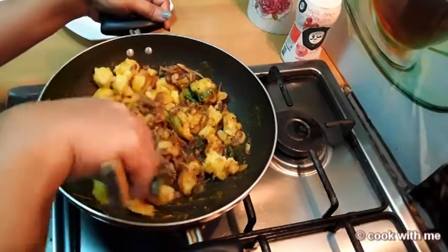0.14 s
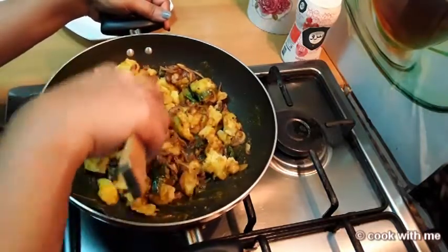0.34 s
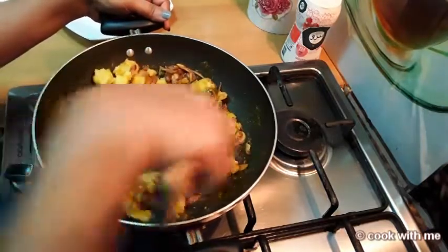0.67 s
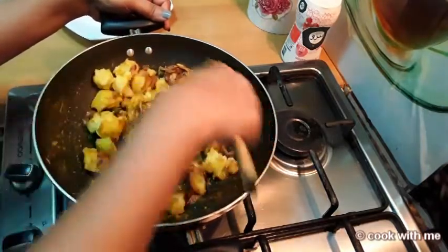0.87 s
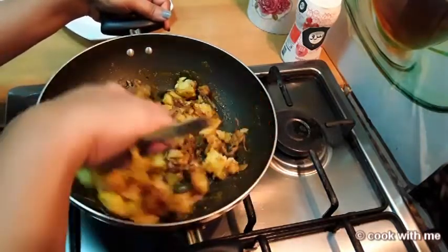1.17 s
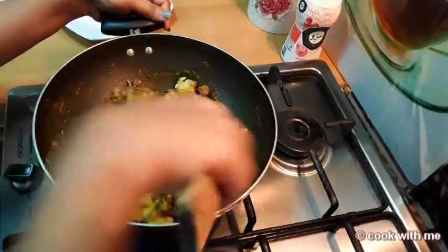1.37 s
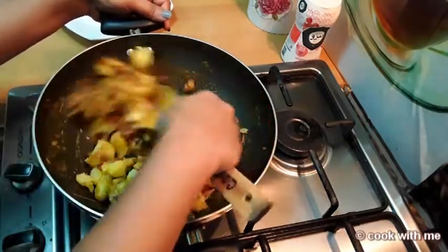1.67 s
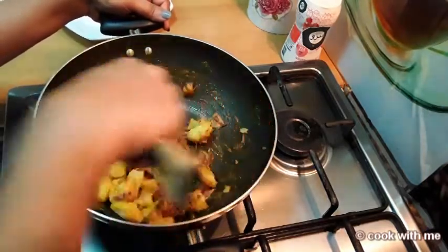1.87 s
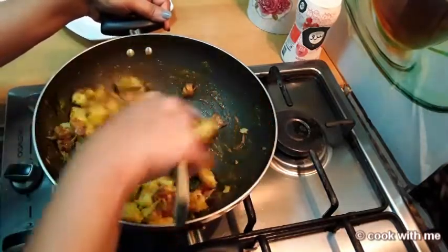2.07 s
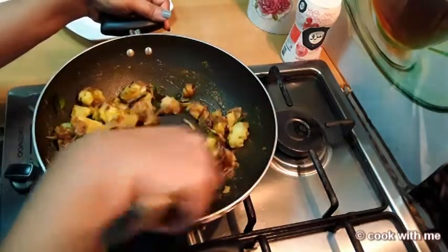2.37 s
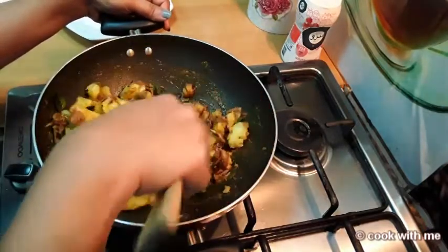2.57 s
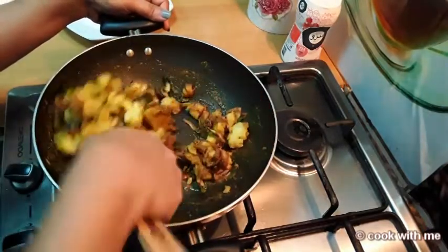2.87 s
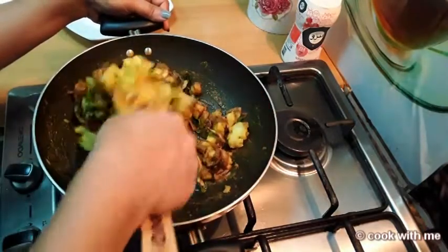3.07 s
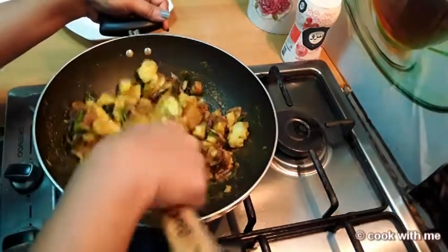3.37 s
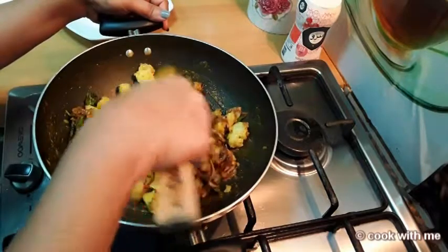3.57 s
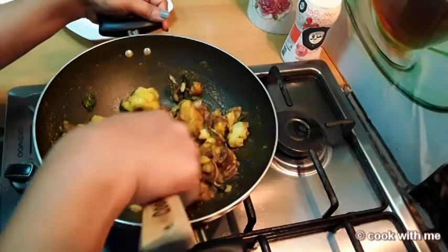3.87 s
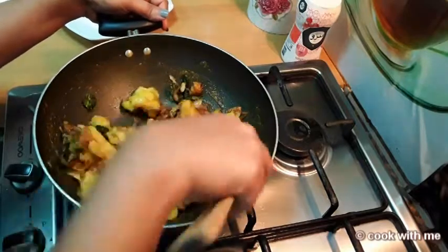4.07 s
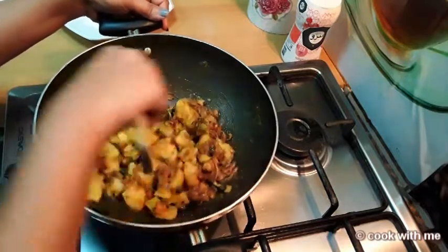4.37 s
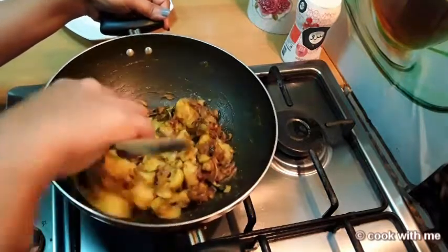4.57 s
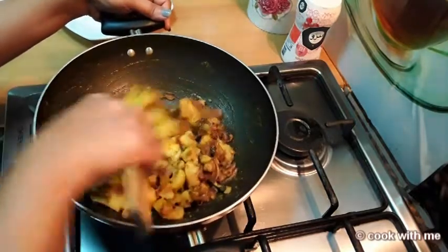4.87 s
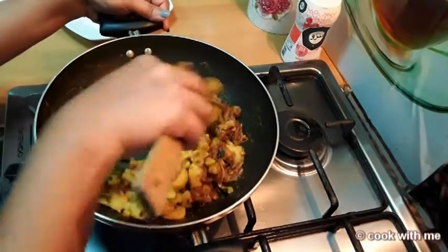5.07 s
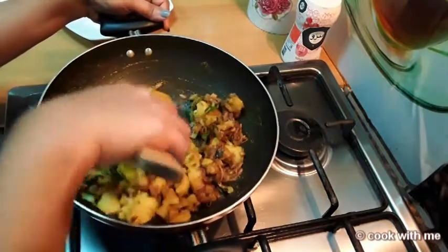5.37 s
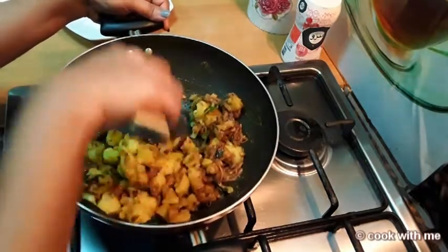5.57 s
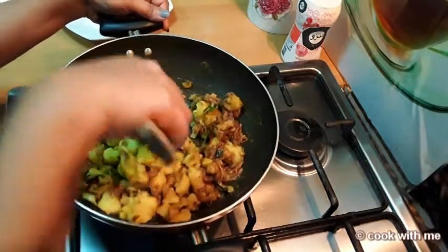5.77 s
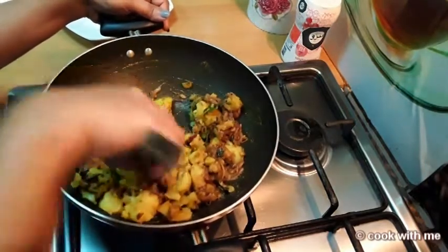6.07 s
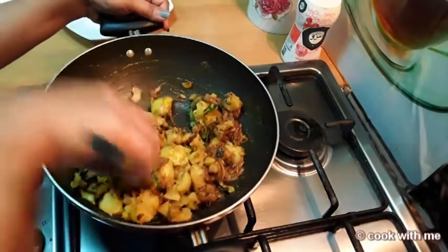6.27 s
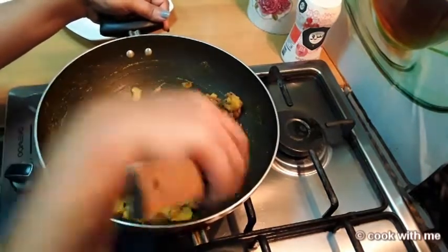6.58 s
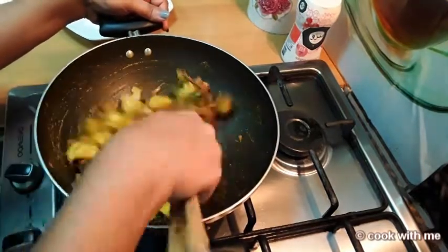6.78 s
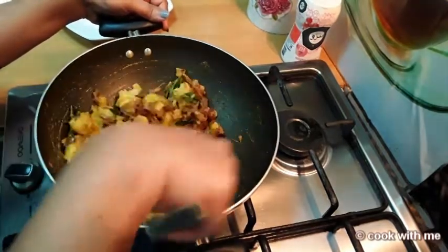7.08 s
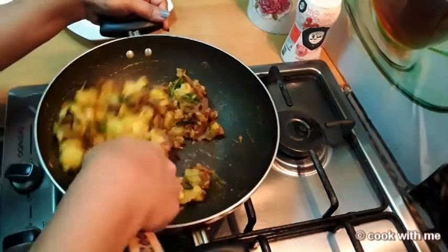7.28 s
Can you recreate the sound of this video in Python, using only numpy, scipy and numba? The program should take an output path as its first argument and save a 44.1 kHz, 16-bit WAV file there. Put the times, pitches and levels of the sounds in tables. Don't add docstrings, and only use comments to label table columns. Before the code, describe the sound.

Close, treble-sharp frying sizzle with crackling spits, short stuttering spatula scrapes and woody pan knocks, building to two loud blows in a small kitchen.

```python
import sys
import numpy as np
from scipy import signal
from scipy.fft import rfft, irfft, next_fast_len
from scipy.io import wavfile
from numba import njit

SR = 44100
rng = np.random.default_rng(int(sys.argv[2]) if len(sys.argv) > 2 else 0)


def attenuation_scalar(level_db):
    decades = np.asarray(level_db, float) / 20
    return 10 ** decades


def unload_audio(sound):
    columns = np.transpose(np.atleast_2d(sound))
    steps = np.round(np.clip(columns, -1, 1) * 32767)
    wavfile.write(sys.argv[1], SR, steps.astype(np.int16))


N = 328104


def rms_one(x):
    return x / np.sqrt(np.mean(x ** 2) + 1e-20)


def in_time(rows):
    s, *columns = np.transpose(rows)
    return [np.interp(np.arange(N) / SR, s, column) for column in columns]


def colour(x, points):
    size = next_fast_len(N)
    hz = np.maximum(np.arange(size // 2 + 1) * SR / size, 1)
    at_hz, level_db = np.transpose(points)
    gain = attenuation_scalar(np.interp(np.log(hz), np.log(at_hz), level_db, left=-80, right=-80))
    return rms_one(irfft(rfft(x, size) * gain, size)[:N])


def drift(rate_hz):
    r = np.exp(-2 * np.pi * rate_hz / SR)
    wander = signal.lfilter([1], [1, -2 * r, r * r], rng.standard_normal(N + SR))
    return rms_one(wander[SR:])


def grains(per_s, spread_db):
    sizes = attenuation_scalar(spread_db * np.minimum(rng.exponential(1, N), 5))
    signs = rng.choice([-1, 1], N)
    return sizes * signs * (rng.random(N) < per_s / SR)


def clicks_at(seconds, sizes):
    out = np.zeros(N)
    out[(np.asarray(seconds) * SR).astype(int)] = sizes
    return out


def burst(seconds, sizes, t60):
    fall = signal.lfilter([1], [1, -attenuation_scalar(-60 / (t60 * SR))], clicks_at(seconds, sizes))
    return fall * rng.standard_normal(N)


def high_pass(x, hz):
    return signal.sosfilt(signal.butter(2, hz, "high", fs=SR, output="sos"), x)


def ring(clicks, hz, t60):
    r, w = attenuation_scalar(-60 / (t60 * SR)), 2 * np.pi * hz / SR
    return signal.lfilter([0, np.sin(w)], [1, -2 * r * np.cos(w), r * r], clicks + 1e-18)


@njit
def glide(x, w, r):
    y = np.zeros(len(x))
    for i in range(2, len(x)):
        y[i] = np.sqrt(1 - r * r) * (x[i] - x[i - 2]) + 2 * r * np.cos(w[i]) * y[i - 1] - r * r * y[i - 2]
    return y


def resonate(x, w, width_hz):
    return glide(x, w, np.exp(-np.pi * width_hz / SR))


# hz, density_db
HUM = [(35, -20), (48, -6.5), (58, 6), (72, -16.5), (98, -0.5), (125, -1.5), (165, -9), (250, -13),
       (325, -5), (400, -13), (480, -15.5), (560, -15.5), (700, -56)]
HUM_DB = -55.5


def room_hum():
    return colour(rng.standard_normal(N), HUM) * attenuation_scalar(HUM_DB + 1.2 * drift(4))


# hz, density_db
FLAME = [(6000, -36), (9500, -13), (12000, -6), (14000, 1.5), (16500, 8.5)]
FLAME_DB, FLAME_FOLLOWS = -38.5, 0.25


def gas_flame(vigour_db):
    return colour(grains(12000, spread_db=1.0), FLAME) * attenuation_scalar(FLAME_DB + FLAME_FOLLOWS * vigour_db)


# at_s, sizzle_db
FRYING = [(0.35, -36.5), (0.79, -39), (1.08, -31.5), (1.22, -36.5), (1.41, -40.5), (1.6, -34), (1.76, -39),
          (2.51, -38.5), (2.82, -34.5), (3.22, -43), (3.38, -39), (4.3, -35), (5.25, -39.5), (5.51, -39.5),
          (6.1, -42.5), (7.0, -37.5), (7.2, -37), (7.44, -40)]
# hz, density_db
SIZZLE = [(2500, -21), (4500, -12), (6000, -15), (8000, -1), (10000, 0), (12000, -1), (14000, -1),
          (16500, -5)]
# hz, density_db
FIZZ = [(350, -38), (700, -2), (1200, -4), (2000, 0), (3000, 1.5), (4500, -0.5), (6000, 1.5), (8000, 2)]
FIZZ_DB, FIZZ_FOLLOWS = -51.5, 0.42


def frying():
    sizzle_db, = in_time(FRYING)
    vigour_db = sizzle_db + 40
    gust = drift(12.0)
    sizzle_level = attenuation_scalar(sizzle_db - 7.5 + 1.4 * gust + 0.45 * drift(130))
    sizzle = colour(grains(7000, spread_db=2.0), SIZZLE) * sizzle_level
    fizz_level = attenuation_scalar(FIZZ_DB + FIZZ_FOLLOWS * vigour_db + 1.1 * gust + 0.2 * drift(9.3))
    fizz = colour(grains(5000, spread_db=-0.5), FIZZ) * fizz_level
    return sizzle + fizz + room_hum() + gas_flame(vigour_db)


# start_s, peak_db
SPITS = [(0.0465, -7), (0.1204, -21.5), (0.1979, -17), (0.294, -42), (0.5484, -14.5), (0.7692, -12),
         (0.826, -12), (1.0176, -10), (1.052, -26), (1.3798, -17), (1.6472, -15), (2.2288, -18),
         (2.594, -17), (3.2544, -21), (3.3737, -22), (3.6287, -31), (3.7824, -18), (3.8681, -12),
         (3.914, -17), (4.905, -7), (4.9566, -15), (5.003, -19), (5.571, -13), (5.9319, -18), (6.562, -27),
         (7.215, -9), (7.2705, -13)]
CRACKLES_PER_S, CRACKLE_DB, CRACKLE_LOW_HZ = 45, -33.5, 7000


def spits():
    s, peak_db = np.transpose(SPITS)
    needle = clicks_at(s, attenuation_scalar(peak_db - 2))
    hiss = burst(s, attenuation_scalar(peak_db - 13), t60=0.0085)
    crackle = high_pass(grains(CRACKLES_PER_S, spread_db=3.5), CRACKLE_LOW_HZ)
    return high_pass(needle + hiss, 6800) + attenuation_scalar(CRACKLE_DB) * crackle


def stand(s, shove_db):
    push = signal.lfilter([.02], [1, -.98], clicks_at(s, attenuation_scalar(shove_db)))
    upper = ring(push, 205.0, 0.2) + 1.55 * ring(push, 274, 0.11)
    return upper + 0.45 * ring(push, 176, 0.43) + 0.22 * ring(push, 99.4, 0.39)


# start_s, shove_db
THUDS = [
    (.75, -37.5),
    (1.43, -40),
    (3.681, -59),
    (5.97, -40),
]


def food_thuds():
    return stand(*np.transpose(THUDS))


def pressure_db(start, hold, db, in_db_per_s, out_db_per_s):
    t = np.arange(N) / SR
    early, late = np.maximum(start - t, 0), np.maximum(t - start - hold, 0)
    return db - in_db_per_s * early - out_db_per_s * late


# full_pressure_s, hold_s, scrape_db, contact_hz, rasp_db
STROKES = [
    (0.06, 0.0083, -22, 1120, -43),
    (0.433, 0.045, -19, 1150, -35.5),
    (0.962, 0.0045, -26, 1120, -31),
    (1.492, 0.022, -24, 1660, -39),
    (1.53, .035, -29.5, 1650, -44),
    (2.711, 0.011, -44, 2200, -31),
]
# full_pressure_s, hold_s, scrape_db, contact_hz, rasp_db
SKIDS = [(0.766, 0.076, -42.5, 1930, -37), (1.017, 0.049, -43.5, 860, -39.5),
         (1.09, 0.022, -39.5, 870, -37), (1.46, 0.04, -45, 1690, -35), (2.045, 0.01, -30, 1590, -29.5),
         (2.813, .02, -48.5, 1220, -40.5), (3.224, 0.17, -52.5, 2100, -42), (3.717, 0.11, -64, 2160, -45),
         (4.825, 0.015, -37, 1200, -36), (4.884, 0.034, -55, 1940, -43), (5.175, 0.081, -53, 2080, -45.5),
         (5.255, 0.017, -46.5, 910, -40.5), (5.673, 0.007, -43.5, 1080, -46),
         (7.126, 0.068, -42.5, 1790, -41)]
# start_s, scrape_db, contact_hz, rasp_db
SLIDES = [
    (1.999, -33, 1350, -52),
    (2.33, -38.5, 1680, -32.5),
    (2.67, -62, 1500, -41),
    (4.04, -52, 2400, -34.5),
    (5.6, -60, 760, -62),
    (6.591, -35.5, 1050, -30.5),
    (7.02, -33.5, 1600, -33.5),
]
# at_s, scrape_db, contact_hz
SWEEP = [
    (4.06, -62, 1800),
    (4.12, -44.5, 1590),
    (4.17, -50, 1600),
    (4.24, -45, 2020),
    (4.279, -38.5, 1130),
    (4.36, -48, 780),
    (4.41, -45.5, 657),
    (4.459, -42.5, 1720),
    (4.51, -64, 1900),
]
PRESS_DB_PER_S, LIFT_DB_PER_S, RASP_IN_DB_PER_S, RASP_OUT_DB_PER_S = 603, 402, 322, 219
SLIDE_IN_DB_PER_S, SLIDE_OUT_DB_PER_S, SLIDE_RASP_OUT_DB_PER_S = 1500, 151, 93
FIRM_CHATTER_DB, SKID_CHATTER_DB, SLIDE_CHATTER_DB, SWEEP_CHATTER_DB = -22, 0, -5.5, -0.5
SWEEP_RASP_DB = 3


def blade():
    before, after = (SWEEP[0][0] - .03, -99, 1800), (SWEEP[-1][0] + .05, -99, 1900)
    sweep_db, sweep_hz = in_time([before, *SWEEP, after])
    power = attenuation_scalar(2 * sweep_db)
    pitch = power * np.log(sweep_hz)
    chatter = power * attenuation_scalar(2 * SWEEP_CHATTER_DB)
    rasp = power * attenuation_scalar(2 * SWEEP_RASP_DB)
    push = (PRESS_DB_PER_S, LIFT_DB_PER_S, RASP_IN_DB_PER_S, RASP_OUT_DB_PER_S)
    slide = (SLIDE_IN_DB_PER_S, SLIDE_OUT_DB_PER_S, SLIDE_IN_DB_PER_S, SLIDE_RASP_OUT_DB_PER_S)
    rows = [(*row, FIRM_CHATTER_DB, *push) for row in STROKES]
    rows += [(*row, SKID_CHATTER_DB, *push) for row in SKIDS]
    rows += [(s, 0, *rest, SLIDE_CHATTER_DB, *slide) for s, *rest in SLIDES]
    for s, hold, db, hz, rasp_db, chatter_db, rise, fall, rasp_rise, rasp_fall in rows:
        own = attenuation_scalar(2 * pressure_db(s, hold, db, rise, fall))
        power = power + own
        pitch = pitch + own * np.log(hz)
        chatter = chatter + own * attenuation_scalar(2 * chatter_db)
        rasp = rasp + attenuation_scalar(2 * pressure_db(s, hold, rasp_db, rasp_rise, rasp_fall))
    return np.sqrt(power), np.exp(pitch / power), np.sqrt(chatter / power), np.sqrt(rasp)


# hz, level_db, t60_s
BOWL = [(390, 0.5, 0.06), (584, 2.5, 0.045), (620, -8, 0.11), (780, 6.5, 0.021), (848, 3.5, 0.059),
        (976, -2.5, 0.091), (1120, -11, 0.078), (1158.5, -4.5, 0.073), (1217, -7.5, 0.038),
        (1323, -5.5, 0.015), (1610, -53, 0.11), (1727, -22, 0.096), (1808, -9, 0.13), (1976, -12.5, 0.16),
        (2240, -11, 0.021), (2408, -3, 0.036), (3000, -17, 0.025), (3300, -26, 0.02), (3360, -7, 0.025)]


def scrape():
    slips = rms_one(grains(4000, spread_db=0.5)) * attenuation_scalar(2 * drift(140))
    level, hz, chatter, rasp = blade()
    w = 2 * np.pi * hz / SR
    wide = resonate(resonate(slips, w, 1300), 0.82 * w, 1200)
    first = resonate(resonate(wide, w, 850), 1.05 * w, 1000)
    overtone = resonate(resonate(slips, 1.5 * w, 900), 2.58 * w, 1500)
    contact = high_pass(high_pass(rms_one(first), 640), 640) + attenuation_scalar(-10) * rms_one(overtone)
    loose = rms_one(resonate(resonate(slips, .9 * w, 1800), 1.2 * w, 3000))
    drive = level * (contact + attenuation_scalar(9) * chatter * loose)
    pan = sum(attenuation_scalar(db - 45.5) * ring(drive, mode_hz, t60) for mode_hz, db, t60 in BOWL)
    dry_rasp = rasp * rms_one(high_pass(slips, 2400))
    return attenuation_scalar(-8.0) * drive + attenuation_scalar(1.0) * dry_rasp + pan


PUSH_DB, PUSH_FOLLOWS = -38.5, 0.46


def knocks(table, body, rim, clatter_db, spot_db):
    s, db, crack_db, rim_db, bright_hz = np.transpose(table)
    place_db = spot_db * rng.normal(0, 1, (len(s), len(body) + len(rim)))
    out = np.zeros(N)
    for k, (hz, mode_db, t60) in enumerate(body):
        soft_db = -6 * np.abs(np.log2(hz / bright_hz))
        strike = clicks_at(s, attenuation_scalar(db + mode_db + soft_db - 8 + place_db[:, k]))
        out += (-1) ** k * ring(strike, hz, t60)
    for k, (hz, mode_db, t60) in enumerate(rim):
        hard_db = 0.85 * crack_db * max(np.log2(hz / 2500), 0)
        strike = clicks_at(s, attenuation_scalar(db + rim_db + mode_db + hard_db - 2.0 + place_db[:, -1 - k]))
        out += (-1) ** k * ring(strike, hz, t60)
    latest = np.maximum(np.searchsorted(s, np.arange(N) / SR) - 1, 0)
    w = 2 * np.pi * bright_hz[latest] / SR
    clatter = resonate(burst(s, attenuation_scalar(db + clatter_db), t60=0.17), w, 1500)
    crack = high_pass(burst(s, attenuation_scalar(db + crack_db - 1.5), t60=0.088), 3300)
    slap = resonate(burst(s, attenuation_scalar(db - 48.0), t60=0.0068), 2.1 * w, 3000)
    shove = stand(s + 0.0013, PUSH_DB + PUSH_FOLLOWS * (db + 20.5))
    return out + clatter + crack + slap + shove


# start_s, bowl_db, crack_db, rim_db, brightest_hz
KNOCKS = [(0.748, -39, -5, -17, 1740), (1.412, -29, -26, -8, 990), (1.992, -21.5, -48, -4.5, 660),
          (2.309, -19, -2, -4.5, 1270), (2.66, -19.5, -2.5, -12.5, 2140), (3.052, -47.5, 11, -22, 2340),
          (3.672, -33.5, -16, -36, 390), (4.027, -23, 7, -12.5, 2500), (5.584, -19.5, -35, -27, 630),
          (6.575, -11.5, -3, -18.5, 2440), (7.0, -18.5, 1.5, -5.5, 1700)]
# hz, level_db, t60_s
RIM = [(1502, -0.5, 0.067), (2010, 0.5, 0.058), (2643, -6.5, 0.11), (3220, -11, 0.064), (4066, -2.5, 0.11),
       (4930, -10, 0.1), (7060, -2.5, 0.098), (7960, -2.5, 0.076), (9350, 0, 0.052)]


def loaded_bowl_knocks():
    return knocks(KNOCKS, BOWL, RIM, clatter_db=-16.5, spot_db=2.5)


# start_s, wall_db, crack_db, rim_db, brightest_hz
BLOWS = [
    (5.953, -8.5, -42, -17.5, 1100),
    (6.281, -11, -19.5, -5, 930),
]
# hz, level_db, t60_s
WALL = [(392, -10.5, 0.088), (508, -5, 0.035), (618, -15, 0.14), (847, 2, 0.05), (1002, -1, 0.078),
        (1055, -25, .07), (1120, -2, 0.041), (1152, -2, 0.12), (1246, 4.5, 0.054), (1325, -8, 0.068),
        (1980, -3, 0.082), (2200, -8, 0.091), (2260, -1.5, 0.099), (2960, -6, 0.083), (3140, -8.5, 0.14),
        (3470, -1.5, 0.037), (4800, -6, .04), (5600, -7, .05)]
# hz, level_db, t60_s
LIP = [(575, -13, 0.094), (780, -7, 0.05), (821, 1, 0.055), (1500, -15, 0.027), (1733, 0.5, 0.032),
       (2350, 2, 0.04), (2540, -6.5, 0.099), (3055, 1, 0.031)]


def bare_wall_blows():
    return knocks(BLOWS, WALL, LIP, clatter_db=-19, spot_db=2.2)


KITCHEN_T60_S, WALL_CUT_HZ, KITCHEN_DB = 0.41, 10400, -14.5


def kitchen(x):
    size = next_fast_len(N + SR)
    z = np.exp(-2j * np.pi * np.arange(size // 2 + 1) / size)
    dull = np.exp(-2 * np.pi * WALL_CUT_HZ / SR)
    wall = (1 - dull) / (1 - dull * z)
    tail = 0
    for k, lag in enumerate((rng.uniform(.014, .05, 14) * SR).astype(int)):
        loop = attenuation_scalar(-60 * lag / SR / KITCHEN_T60_S) * wall ** (lag / SR / 0.015) * z ** lag
        tail = tail + (-1) ** k * loop / (1 - loop)
    for lag in (53, 131, 229):
        tail = tail * (z ** lag - .6) / (1 - .6 * z ** lag)
    return irfft(rfft(x, size) * tail, size)[:N]


def scene():
    hits = loaded_bowl_knocks() + bare_wall_blows() + spits() + food_thuds()
    rub = scrape()
    echoes = attenuation_scalar(KITCHEN_DB) * kitchen(hits + attenuation_scalar(-8.0) * rub)
    return (hits + rub + echoes + frying())[None]


MIC_HZ, MIC_WIDTH_HZ, MIC_PEAK_DB = 8640, 750, 12.5
MIC_LOW_HZ, MIC_HIGH_HZ, TOP_HZ = 66.7, 9260, 15830
DUCK_DB, DUCK_FALL_S, DUCK_HOLD_S, DUCK_RECOVER_S = -7, 0.43, 0.24, 0.52


def low_pass(x):
    return signal.sosfilt(signal.butter(12, 16630, fs=SR, output="sos"), x)


def record(dry):
    moments = BLOWS[0][0] + np.cumsum([0, DUCK_FALL_S, DUCK_HOLD_S, DUCK_RECOVER_S])
    dry = dry * attenuation_scalar(np.interp(np.arange(N) / SR, moments, [0, DUCK_DB, DUCK_DB, 0]))
    r, w = np.exp(-np.pi * MIC_WIDTH_HZ / SR), 2 * np.pi * MIC_HZ / SR
    port = signal.lfilter([(1 - r * r) / 2, 0, (r * r - 1) / 2], [1, -2 * r * np.cos(w), r * r], dry)
    heard = high_pass(dry + (attenuation_scalar(MIC_PEAK_DB) - 1) * port, MIC_LOW_HZ)
    heard = signal.sosfilt(signal.butter(3, MIC_HIGH_HZ, fs=SR, output="sos"), heard)
    heard = signal.sosfilt(signal.cheby2(16, 60, TOP_HZ + 120, fs=SR, output="sos"), heard)
    return low_pass(heard)


dry = scene()
out = record(dry)
unload_audio(out)
```